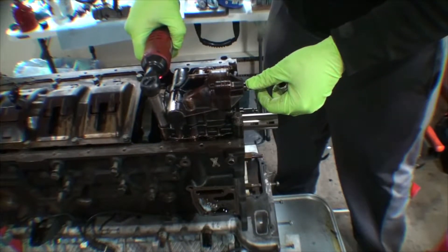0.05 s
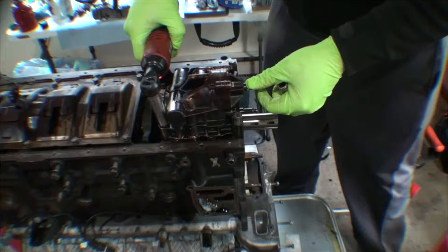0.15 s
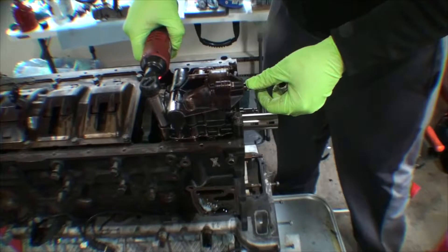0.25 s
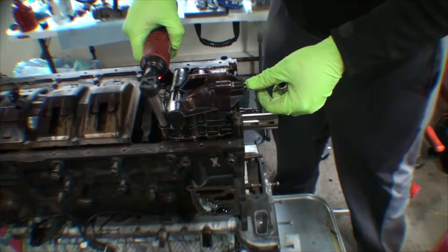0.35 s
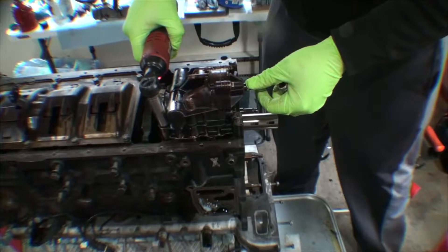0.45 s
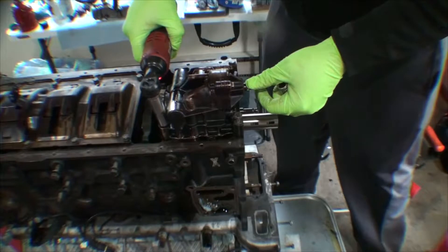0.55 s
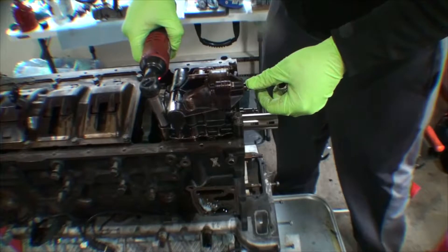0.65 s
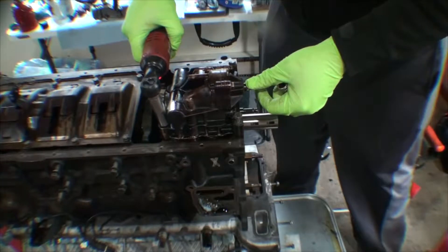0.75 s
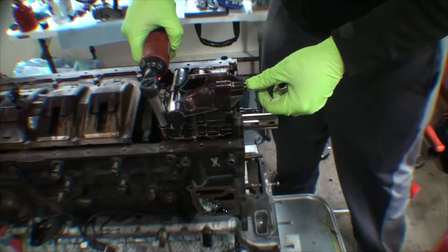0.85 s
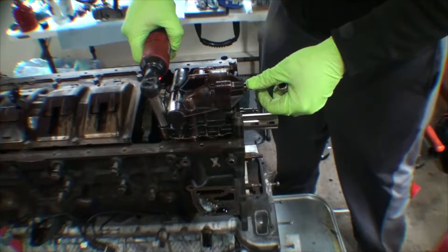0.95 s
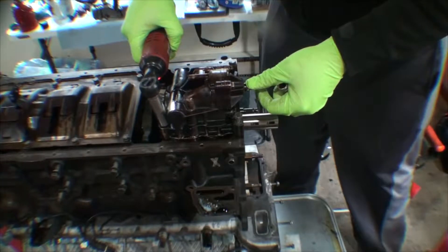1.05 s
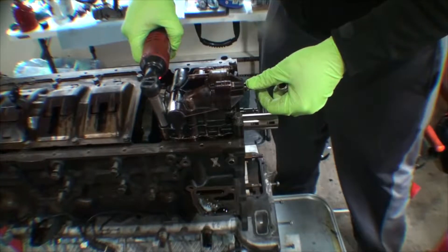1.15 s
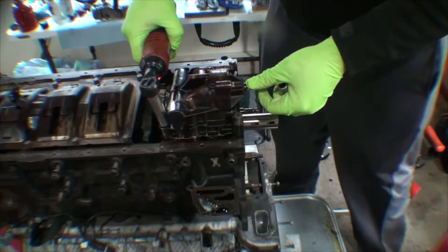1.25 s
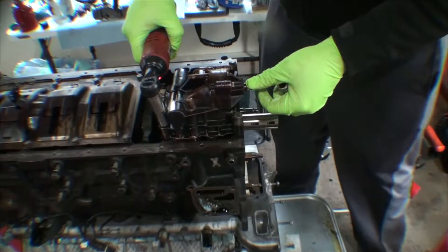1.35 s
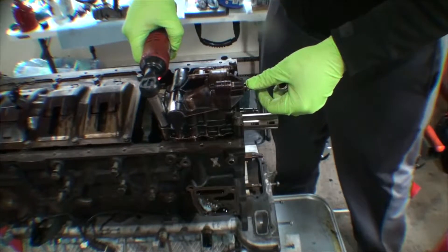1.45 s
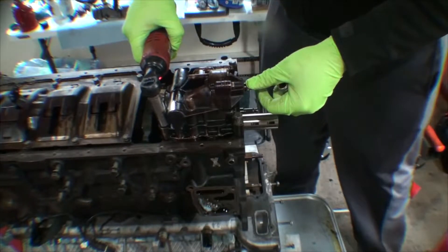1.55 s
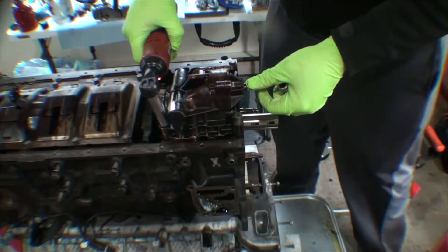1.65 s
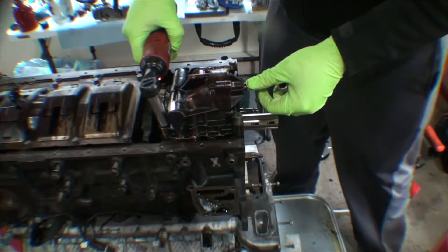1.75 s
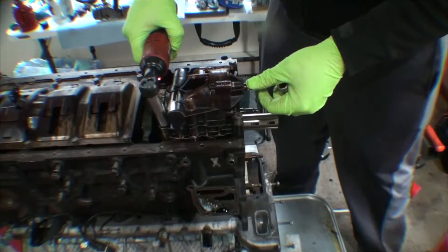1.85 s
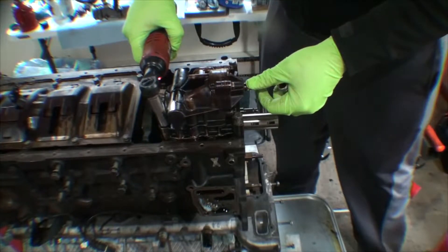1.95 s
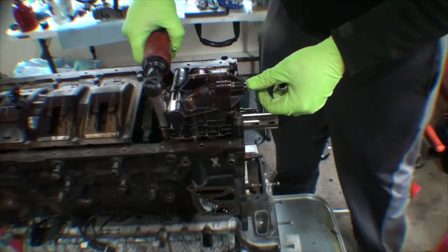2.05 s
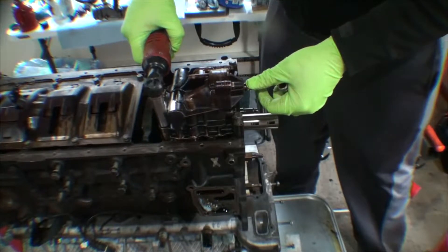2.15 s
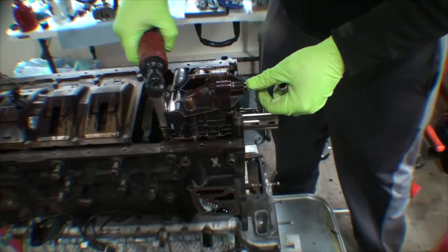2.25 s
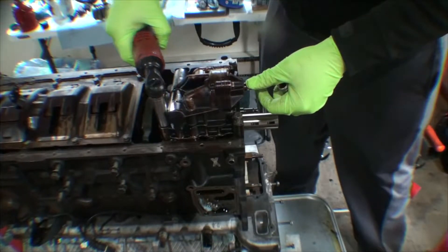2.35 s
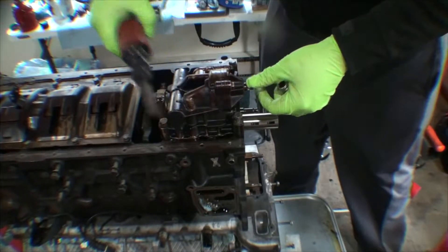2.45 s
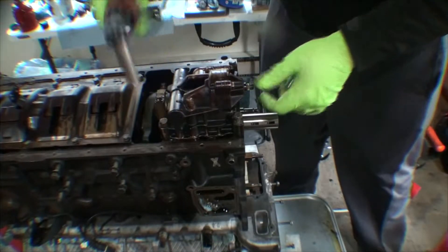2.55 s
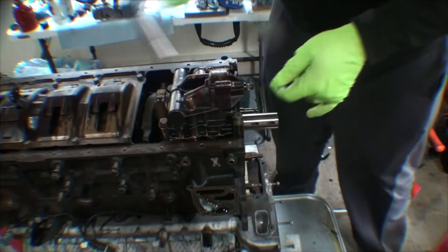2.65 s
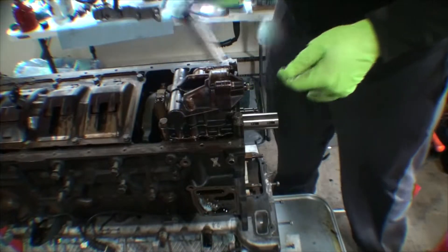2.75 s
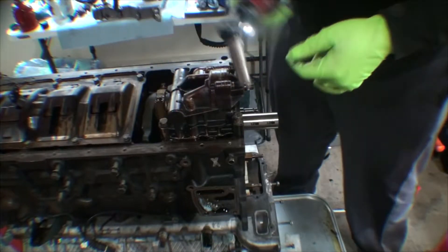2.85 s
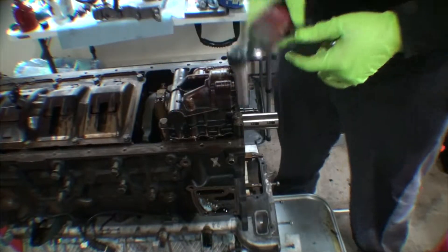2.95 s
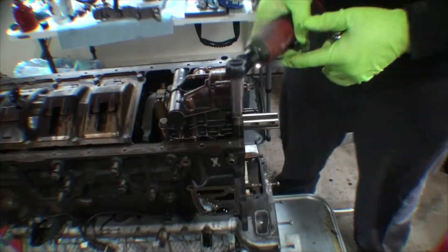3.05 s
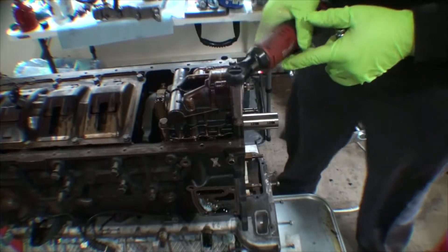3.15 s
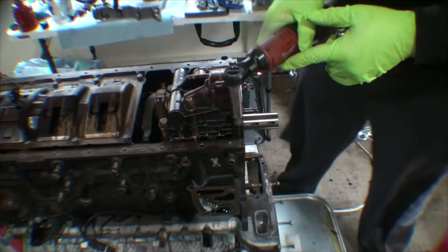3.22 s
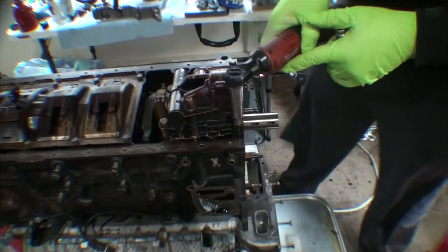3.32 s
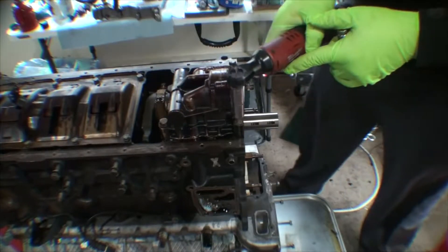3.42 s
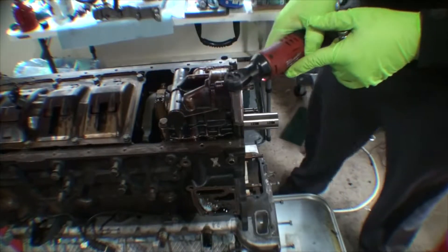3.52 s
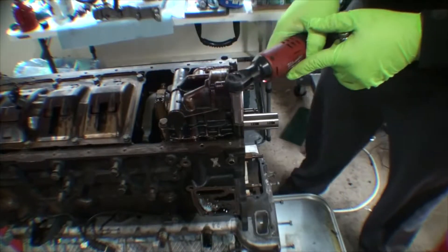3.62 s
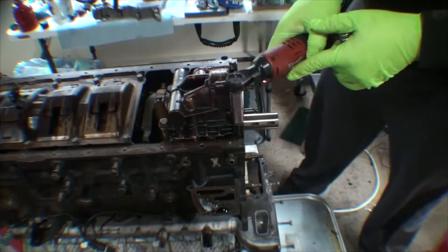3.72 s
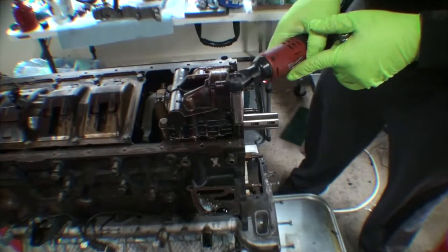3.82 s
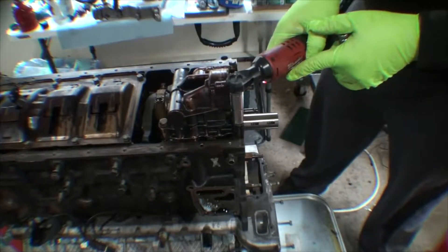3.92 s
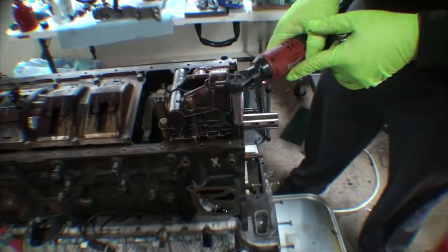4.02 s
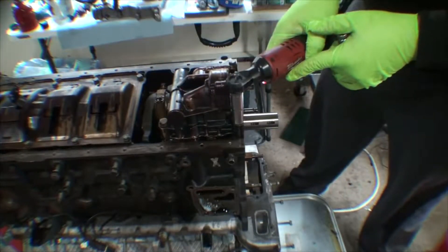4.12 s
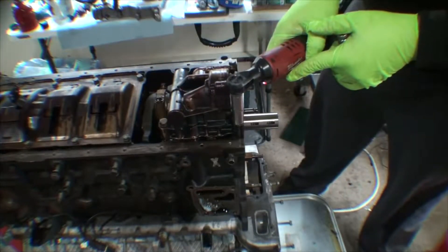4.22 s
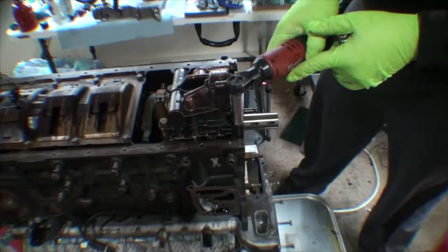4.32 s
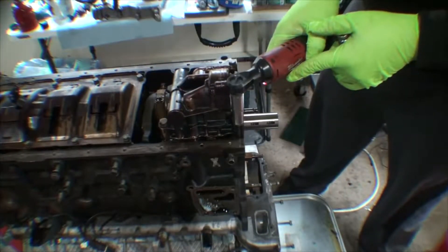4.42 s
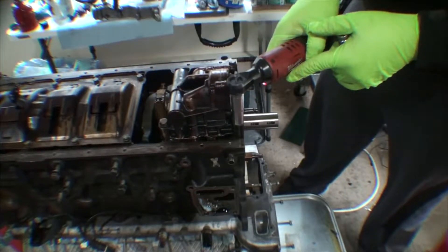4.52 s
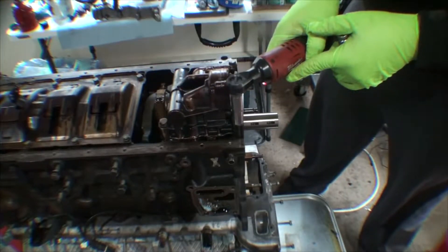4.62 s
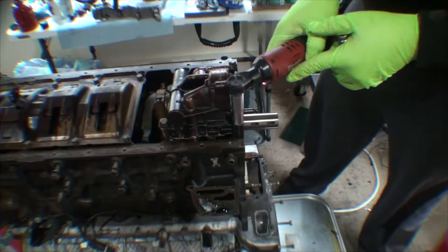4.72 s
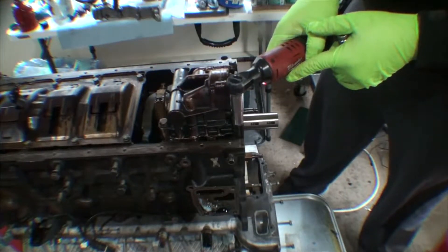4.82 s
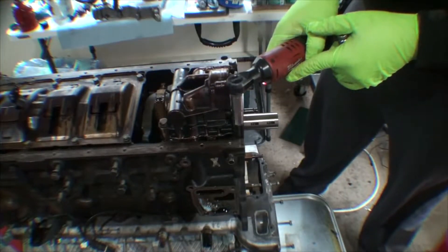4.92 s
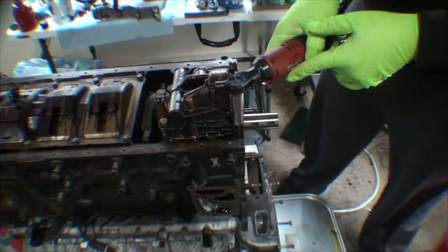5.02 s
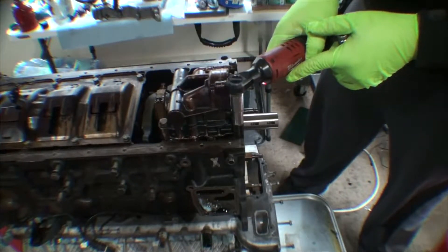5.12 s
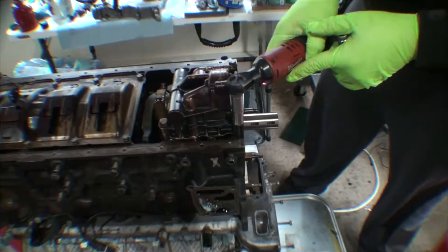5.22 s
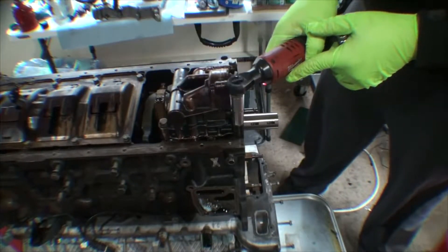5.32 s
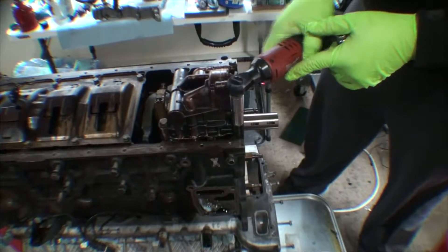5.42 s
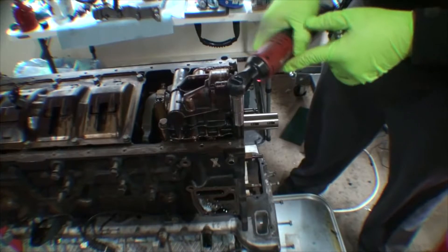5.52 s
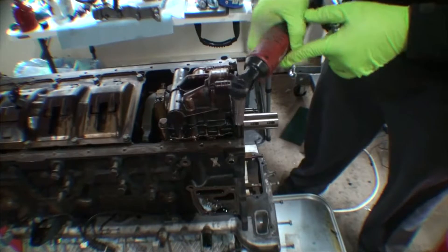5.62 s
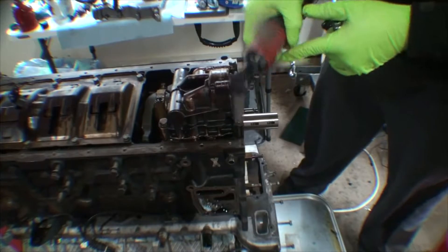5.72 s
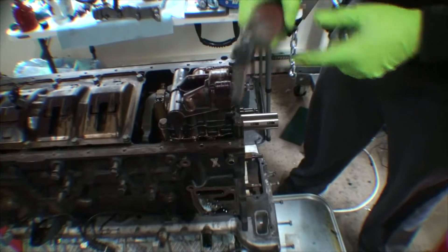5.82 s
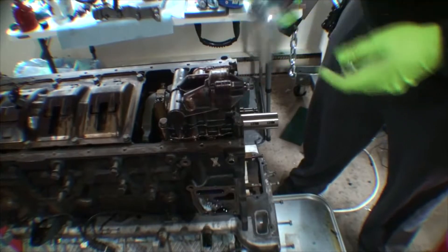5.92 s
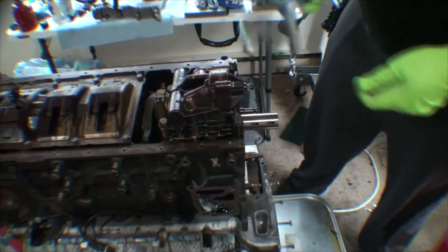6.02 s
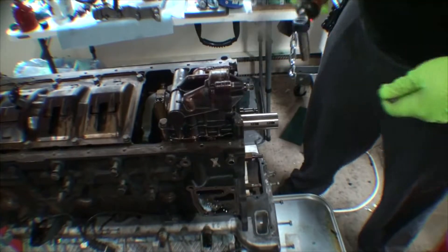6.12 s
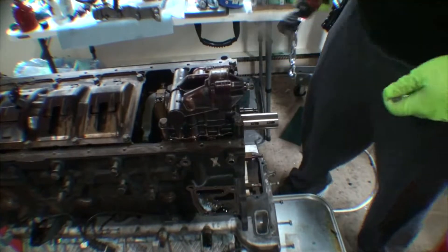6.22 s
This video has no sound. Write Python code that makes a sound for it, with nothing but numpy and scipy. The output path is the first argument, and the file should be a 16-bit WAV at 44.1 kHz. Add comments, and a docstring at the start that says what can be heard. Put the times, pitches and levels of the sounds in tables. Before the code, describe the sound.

Close by in a small workshop, a power ratchet tightens two bolts in an engine block, in two bursts of about two seconds each. Each is a whining, rattling stream of sharp clicks that drags down in speed as the bolt comes tight. The steel socket clanks going on and coming off, and the block rings and thuds faintly. Gloves and sleeves rustle very softly in the quiet after each run.

```python
"""A cordless ratchet runs two bolts into an engine block in a small workshop, slowing as each seats.
In every stroke the pawl snaps twice and the yoke knocks, while the gear teeth rattle and whine.
The pawl snaps extra hard on some strokes of the first bolt; the thread binds now and then on both.
The socket clanks as it seats and is lifted off; the block rings and shudders on its stand.
Gloves and sleeves rustle over quiet air, and the room answers."""
import sys
import numpy as np
from scipy import signal
from scipy.fft import rfft, irfft, next_fast_len
from scipy.io import wavfile
from scipy.ndimage import uniform_filter1d

SR = 44100
rng = np.random.default_rng(int(sys.argv[2]) if len(sys.argv) > 2 else 0)


def store_pcm(level_fs):
    """Save levels as 16-bit WAV."""
    pcm = np.round(np.clip(level_fs, -1, 1) * 32767).astype(np.int16)
    wavfile.write(sys.argv[1], SR, np.atleast_2d(pcm).T)


N = 276504
T = np.arange(N) / SR
HZ = np.maximum(np.arange(N // 2 + 1) * SR / N, 1)

# Low modes of the block on its stand. Each row: frequency in Hz, width in Hz, gain in dB.
STAND_MODES = [(176.4, 20, -3.5), (338.8, 34, 2.5), (428, 55, -5.5)]


def undb(db):
    """Decibels to gain."""
    return 10 ** (np.asarray(db) / 20)


def unit(x):
    """Scale to rms 1."""
    return x / np.sqrt(np.mean(x ** 2))


def noise():
    """White noise."""
    return rng.standard_normal(N)


def walk(rate_hz):
    """Smooth random motion, spread near 1."""
    hold = int(SR / rate_hz)
    steps = np.repeat(rng.standard_normal(N // hold + 1), hold)[:N]
    return 1.3 * uniform_filter1d(steps, hold)


def fade(start_s, decay_s):
    """Sudden onset, exponential decay."""
    return (T >= start_s) * np.exp(-np.abs(T - start_s) / decay_s)


def bump(centre_s, half_s):
    """Gaussian envelope."""
    return np.exp(-((T - centre_s) / half_s) ** 2)


def curve(points):
    """Interpolate (Hz, value) points over log frequency."""
    hz, values = np.transpose(points)
    return np.interp(np.log(HZ), np.log(hz), values)


def spectrum(points):
    """Gain curve from (Hz, dB) points."""
    return undb(curve(points))


def resonances(modes):
    """Gain curve from (Hz, width Hz, dB) peaks."""
    return sum(undb(db) / (1 + (2 * (HZ - hz) / width_hz) ** 2) for hz, width_hz, db in modes)


def colour(x, gain):
    """Minimum-phase filter, gain scaled to rms 1: rings after a blow, never before."""
    cepstrum = irfft(np.log(unit(gain) + 1e-6), N)
    cepstrum[1:N // 2] *= 2
    cepstrum[N // 2 + 1:] = 0
    response = irfft(np.exp(rfft(cepstrum)), N)[:SR // 10]
    return signal.fftconvolve(x, response)[:N]


def steady(x):
    """Even out the level over 0.1 s."""
    power = uniform_filter1d(x ** 2, SR // 10)
    return x / np.sqrt(power + power.max() / 100)


def close_pair(pair):
    """Two close microphones hear diffuse sound partly alike."""
    # Each row: frequency in Hz, coherence 0-1.
    coherence = [(50, 0.65), (300, 0.92), (1000, 0.79), (2500, 0.25), (5000, 0.23), (8000, 0), (12000, 0.6)]
    alike = np.clip(curve(coherence), 0, 1)
    mid, side = rfft(pair) * np.sqrt([(1 + alike) / 2, (1 - alike) / 2])
    return irfft([mid + side, mid - side], N)


def aim(pair, balance):
    """Stereo phase and balance; balance points are (Hz, left minus right dB)."""
    # Each row: frequency in Hz, lead of the left channel in radians.
    phase_lead = [(0, 0), (260, -1.16), (600, -1), (2930, -0.58), (6290, -0.14), (7670, 0.94), (9650, 1),
                  (11500, 0.26), (16600, 0.094)]
    gain = np.sqrt(spectrum(balance)) * np.exp(.5j * curve(phase_lead))
    return irfft(rfft(pair) * [gain, 1 / gain], N)


def echo(near_db, room_db, near_s=0.0066, build_s=0.0027, t60_low_s=0.49, t60_high_s=0.24):
    """Quick reflections off the engine, then a room tail that dies sooner in the treble."""
    t = T[:SR // 2]
    near = unit(rng.standard_normal(len(t)) * np.exp(-t / near_s))
    hz, frame_s, bins = signal.stft(rng.standard_normal(len(t)), SR)
    t60_s = np.interp(hz, [700, 13000], [t60_low_s, t60_high_s])
    tail = signal.istft(bins * np.exp(-np.log(1000) * frame_s / t60_s[:, None]), SR)[1][:len(t)]
    tail = unit(tail * (1 - np.exp(-t / build_s)))
    return (undb(near_db) * near + undb(room_db) * tail) / np.sqrt(len(t))


def workshop(x, near_db, room_db, shake_hz=30, paths=6):
    """Direct sound plus echoes; the shaking tool shifts its sound among the paths."""
    shares = np.array([walk(shake_hz) for _ in range(paths)])
    shares /= np.linalg.norm(shares, axis=0)
    lead = SR // 4  # the tool is already running at 0 s, so pre-fill the room
    parts = np.pad(x * shares, ((0, 0), (lead, 0)), "reflect")
    size = next_fast_len(N + SR)
    responses = np.array([[echo(near_db, room_db) for _ in range(paths)] for _ in range(2)])
    echoes = irfft((rfft(parts, size) * rfft(responses, size)).sum(axis=1), size)[:, lead:lead + N]
    return (x + close_pair(echoes)) / np.sqrt(1 + undb(near_db) ** 2 + undb(room_db) ** 2)


def shop_air(db=-59):
    """Quiet, diffuse room noise."""
    # Each row: frequency in Hz, gain in dB.
    air_colour = [(15, -25.5), (25, -7), (103, -11), (167, -9), (278, -9), (383, -10.5), (450, -12),
                  (749, -12.5), (1210, -14.5), (1420, -17), (5140, -25.5), (6540, -29), (15000, -36)]
    return undb(db) * close_pair([colour(noise(), spectrum(air_colour)) for _ in range(2)])


def rustle():
    """Gloves and sleeves rub as the tool is moved."""
    # Each row: centre in seconds, half length in seconds, level in dB.
    moves = [(2.697, 0.1, -60.5), (2.945, 0.1, -63.5), (6.083, 0.23, -65.5)]
    cloth = colour(noise(), spectrum([(300, -12.5), (1500, -2.5), (10000, -6.0), (15000, -17)]))
    envelope = sum(undb(db) * bump(centre_s, half_s) for centre_s, half_s, db in moves)
    return workshop(cloth * envelope, -2, -2, paths=1)


def blip(centre_s=.42, half_s=.01, low_hz=390, high_hz=520, db=-29):
    """A short, hollow, rising blip."""
    hz = np.interp(T, [centre_s - half_s / 2, centre_s + half_s], [low_hz, high_hz])
    tone = np.sin(2 * np.pi * np.cumsum(hz) / SR)
    return workshop(undb(db) * bump(centre_s, half_s) * tone, -20, -6.5, shake_hz=3, paths=1)


def trigger_squeal(start_s=3.412, decay_s=0.034, hz=5600, db=-42.0):
    """The motor drive sings briefly as the trigger is squeezed."""
    return undb(db) * fade(start_s, decay_s) * np.sin(2 * np.pi * hz * T)


def block_thuds():
    """The heavy block shudders on its stand as torque is taken up and let go."""
    # Each row: start in seconds, level in dB, decay in seconds, relative stand ring in dB.
    jolts = [(1.28, -56.5, 0.32, -12), (2.19, -61, 0.2, 14), (2.329, -52.5, 0.048, 1),
             (2.41, -54.5, 0.062, -0.5), (5.50, -46, 0.069, -8), (5.553, -43.5, 0.06, -3),
             (5.625, -52, .06, 2)]
    # Each row: frequency in Hz, gain in dB.
    thud_colour = [(20, -5), (47, 3.5), (80, -11), (130, -13.5), (178, -5), (250, -10.5), (330, -16),
                   (600, -38.5)]
    push = sum(undb(db) * fade(start_s, decay_s) for start_s, db, decay_s, _ in jolts)
    ring = sum(undb(db + ring_db) * fade(start_s, decay_s) for start_s, db, decay_s, ring_db in jolts)
    thud = colour(push * noise(), spectrum(thud_colour))
    return thud + undb(-6.5) * colour(ring * noise(), resonances(STAND_MODES[:1]))


def socket_ring(start_s=5.496, decay_s=0.014, hz=5000, width_hz=400, db=-16):
    """The socket rings as the second bolt comes up tight."""
    ring = unit(colour(noise(), resonances([(hz, width_hz, 0)])))
    return workshop(undb(db) * fade(start_s, decay_s) * ring, 0, -4.5, paths=1)


def socket_clanks(ref_scrape_s=0.0033, relative_width=0.08):
    """The socket strikes bolt and block; a longer scrape rings the block harder."""
    # Each row: start in seconds, blow count, gap in seconds, level in dB, tilt in dB per octave,
    # scrape decay in seconds, ring pitch in Hz, ring gain in dB.
    contacts = [(0.863, 1, 0, -30.5, -4.5, .012, 2300, -12), (2.161, 1, 0, -18, -1.5, 0.0051, 1500, -5.5),
                (2.235, 2, .025, -17.5, -1, 0.0052, 2780, -8.5),
                (2.314, 2, .008, -19.5, -1.9, .005, 1460, 1.5), (2.352, 1, 0, -24, 17, .001, 1520, -2),
                (2.392, 1, 0, -29, 0.5, 0.0065, 2400, -8), (2.4, 1, 0, -20.5, 1, 0.002, 2400, -11),
                (2.504, 1, 0, -38, 2, 0.00206, 2400, -10), (2.91, 1, 0, -37, -4.5, .003, 868, 7),
                (3.274, 1, 0, -27, 3.5, 0.0035, 4200, 7.5), (3.287, 1, 0, -34.5, -1.5, .016, 1700, -8.5),
                (3.421, 1, 0, -34, -2, 0.049, 1800, -1.5), (3.459, 3, .0055, -16, 1, .0007, 3870, -6),
                (3.4937, 2, .0175, -11.5, 2, .002, 7600, -3), (3.523, 2, .015, -13, 0, 0.002, 3630, -5.5),
                (3.551, 1, 0, -12, 2, .007, 2750, -6), (3.567, 1, 0, -13, 1.5, .0015, 3620, -1),
                (5.439, 2, .034, -11.5, -2, .001, 3700, -5.5), (5.496, 1, 0, -14.5, -.5, .008, 1520, 7.5),
                (5.519, 1, 0, -15, -0.5, .008, 1550, 3), (5.51, 1, 0, -24, -4.5, .03, 539, 9.5),
                (5.548, 2, .0035, -16, 0.5, 0.007, 2250, -6.5), (5.622, 1, 0, -24.5, -2, .008, 2400, -1),
                (5.625, 1, 0, -10.5, 5, 0.0008, 3180, -8)]
    # Each row: frequency in Hz, gain in dB.
    clank_colour = [(100, -29), (180, -21), (260, -20.5), (340, -9), (600, -6.5), (850, 2), (1500, 1),
                    (2500, 2.5), (3700, 2), (5100, -1), (7000, -4.5), (12000, -14), (15000, -38.5)]
    # Each row: frequency in Hz, relative level in dB, T60 in seconds.
    block_modes = [(279.5, -47, 0.64), (339, -37.5, 0.34), (763, -26.5, 0.92), (950, -35.5, 1),
                   (1238, -37.5, .75), (1590, -30, 0.66), (2410, -34, 0.5)]
    clanks, ring, push = 0, 0, np.zeros(N)
    body = spectrum(clank_colour)
    for first_s, count, gap_s, db, tilt_db, scrape_s, ring_hz, ring_db in contacts:
        starts_s = first_s + gap_s * np.arange(round(count))
        scrape = sum(fade(start_s, scrape_s) for start_s in starts_s) * noise()
        tilt = undb(tilt_db * np.log2(np.maximum(HZ, 500) / 2000))
        peak = 1 + resonances([(ring_hz, relative_width * ring_hz, ring_db)])
        clanks += undb(db) * colour(scrape, body * tilt * peak)
        push[(starts_s * SR).astype(int)] += undb(db) * np.sqrt(scrape_s / ref_scrape_s)
    for hz, db, t60_s in block_modes:
        energy = signal.lfilter([1], [1, -np.exp(-2 * np.log(1000) / (t60_s * SR))], push ** 2)
        ring += undb(db) * np.sin(2 * np.pi * hz * T) * np.sqrt(energy)
    return workshop(clanks, -4.5, -4, paths=3) + undb(-9.5) * ring


def motor(timing, strokes_hz, spin_up_s=.03, fade_out_s=0.009):
    """Spins up, then slows with effort: 0 free, 1 loaded, 2 seated. One crank turn per stroke."""
    trigger_s, bite_s, load_s, seat_s, stop_s, first_turn = timing
    loading = 1 - np.clip(1 - (T - bite_s) / load_s, 0, 1) ** 2
    effort = loading + np.clip((T - seat_s) / (stop_s - seat_s), 0, 1)
    spin = 1 - np.exp(-np.maximum(T - trigger_s, 0) / spin_up_s)
    turns = first_turn + np.cumsum(spin * np.interp(effort, [0, 1, 2], strokes_hz)) / SR
    running = spin ** 4 * np.exp(-np.maximum(T - stop_s, 0) / fade_out_s)
    return turns, effort, running


def stroke_times(first_s, count, turns):
    """Times in seconds of successive strokes."""
    return np.interp(np.interp(first_s, T, turns) + np.arange(round(count)), turns, T)


def blows(turns, phase, scatter_db, slop_turns):
    """One impulse per turn at the given phase, uneven in size and timing."""
    marks = np.arange(np.ceil(turns[0] - phase), turns[-1] - phase) + phase
    jitter, size = rng.standard_normal((len(marks), 2)).T
    samples = np.interp(marks + slop_turns * jitter, turns, np.arange(N)).astype(int)
    return np.bincount(samples, undb(scatter_db * np.clip(size, -2, 2)), N)


def chatter(hits, decay_s):
    """Each impulse becomes a noise burst: steel chattering on steel."""
    return signal.lfilter([1], [1, -np.exp(-1 / (decay_s * SR))], hits) * noise()


def thread_binds(turns, body, decay_s=0.0014):
    """The yoke strikes hard where the thread binds."""
    # Each row: start in seconds, stroke count, level in dB.
    binds = [(.038, 4, -14), (.074, 1, -14), (.369, 2, -13.5), (0.443, 4, -13.5), (0.841, 3, -13.5),
             (1.2215, 1, -24), (1.2631, 3, -14.5), (1.696, 3, -13), (1.805, 2, -12), (2.092, 2, -17.5),
             (4.082, 1, -12.5), (4.365, 1, -10.5), (4.444, 1, -9), (4.828, 1, -12), (4.993, 1, -10.5),
             (5.071, 1, -7.5), (5.184, 1, -12)]
    tilt = spectrum([(250, -17.5), (500, -11), (1000, -6.5), (2500, 0.5), (7000, -3.0), (12000, -2.5)])
    push = sum(undb(db) * fade(start_s, decay_s)
               for first_s, count, db in binds for start_s in stroke_times(first_s, count, turns))
    return workshop(colour(push * noise(), body * tilt), -7.5, -8.0, paths=1)


def hard_pawl_ticks(turns, gain_db=-4, half_s=0.00067, spread_hz=450, rebound_s=.003, rebound_db=-4):
    """The pawl snaps extra hard on some strokes: loud, bright ticks, each with a quick rebound."""
    # Each row: start in seconds, tick count, level in dB, pitch in Hz.
    hard_snaps = [(.015, 3, -19, 12400), (.12, 3, -11, 12300), (.21, 1, -10, 12400), (.322, 5, -16, 12400),
                  (.497, 2, -9, 12400), (.651, 1, -6, 12500), (.732, 5, -9.5, 12500),
                  (.898, 2, -7.5, 12650), (1.063, 2, -6.5, 12550), (1.13, 9, -12, 12750),
                  (1.324, 1, -5, 12600), (1.494, 1, -8, 12500), (1.537, 7, -9.5, 12600),
                  (1.736, 1, -8, 12600), (1.78, 1, -9.5, 12500), (1.93, 3, -8, 12500),
                  (2.018, 5, -8, 12650), (2.157, 1, -10, 12700), (2.211, 1, -6.5, 10900),
                  (2.251, 1, -13, 13000), (2.276, 1, -10, 12600)]
    ticks = 0
    wobble = 2 * np.pi * np.cumsum(spread_hz * walk(2500)) / SR
    for first_s, count, db, hz in hard_snaps:
        envelope = sum(bump(at_s, half_s) + undb(rebound_db) * bump(at_s + rebound_s, half_s)
                       for at_s in stroke_times(first_s, count, turns))
        ticks += undb(db + gain_db) * envelope * np.sin(2 * np.pi * hz * T + wobble)
    return workshop(ticks, -12, -15.0, paths=1)


def block_strain(turns, db, tug_db=2.5):
    """Every stroke tugs at the block and rings its stand."""
    tugs = blows(turns, 0, 5.8, 0.016)
    return unit(colour(tugs, resonances(STAND_MODES))) * undb(db + tug_db * walk(9))


def gear_tones(turns, mesh_cycles, whine_db, hum_db):
    """Gears whine at the tooth rate; the drive hums at two crank harmonics."""
    waver = .22 * walk(40)
    whine = np.sin(2 * np.pi * mesh_cycles + waver) * undb(whine_db + 0.75 * walk(25))
    hum = sum(undb(hum_db + 5.0 * walk(10)) * np.sin(2 * np.pi * order * turns + waver)
              for order in (6, 7))
    return whine + hum


def yoke_knocks(turns, lag_turns, scatter_db):
    """The yoke knocks five times per stroke."""
    # Each row: phase in turns, relative level in dB, decay in seconds.
    knocks = [(0.95, -3.5, 0.00093), (.13, -8.5, 0.00076), (.38, 1, 0.0013), (.48, -1.5, 0.0011),
              (.75, 1, 0.00069)]
    return steady(sum(undb(db) * chatter(blows(turns, phase + lag_turns, scatter_db, .018), decay_s)
                      for phase, db, decay_s in knocks))


def pawl_snaps(turns, level_db, modes, swell, slop_turns, swell_db=1.0, peak_limit=6):
    """Two snaps per stroke, their loudest peaks softly rounded; harder once per socket turn."""
    # Each row: phase in turns, relative level in dB, decay in seconds.
    snaps = [(.98, 0, .0005), (.13, -.5, .0005)]
    bursts = sum(undb(db) * chatter(blows(turns, phase, 1.7, slop_turns), decay_s)
                 for phase, db, decay_s in snaps)
    ring = steady(colour(bursts, resonances(modes)))
    period_strokes, hardest_stroke = swell
    bite_db = swell_db * np.cos(2 * np.pi * (turns - hardest_stroke) / period_strokes)
    return peak_limit * np.tanh(ring / peak_limit) * undb(level_db + bite_db)


def ratchet(motion, levels, body, pawl_modes, swell, *, teeth_db, grind_db, scatter_db,
            slop_turns, lag_turns, near_db, room_db, teeth_per_turn=13.2):
    """One bolt: the crank drives yoke, gears and pawl; effort sets their levels."""
    turns, effort, running = motion
    clatter_db, pawl_db, strain_db, whine_db, hum_db = (
        np.interp(effort, [0, 1, 2], column) for column in np.transpose(levels))
    mesh_cycles = turns * teeth_per_turn
    knocks = yoke_knocks(turns, lag_turns, scatter_db)
    rattle = steady(chatter(blows(mesh_cycles, 0, 4.1, .07), 0.00018))
    clatter = colour(knocks + undb(teeth_db) * rattle + undb(grind_db) * noise(), body)
    midrange = signal.sosfilt(signal.butter(2, [600, 9000], "band", fs=SR, output="sos"), clatter)
    clatter *= undb(clatter_db + 0.35 * walk(12)) / np.std(midrange[running > .5])
    tones = gear_tones(turns, mesh_cycles, whine_db, hum_db)
    strain = block_strain(turns, strain_db)
    pawl = pawl_snaps(turns, pawl_db, pawl_modes, swell, slop_turns)
    pawl = workshop(pawl * running, -15, -10)
    return workshop(clatter * running, near_db, room_db) + pawl + (tones + strain) * running


def scene():
    """Bolt a, then bolt b, with handling and room air."""
    # Trigger, bite, load-up time, seat and stop in seconds, then starting crank phase in turns.
    timing_a = (-1, 0, 1.656, 2.021, 2.325, .266)
    timing_b = (3.42, 4.731, .593, 5.4, 5.555, .263)
    # Stroke rate when free, loaded, seated.
    strokes_a_hz = (57.306, 45.795, 37.67)
    strokes_b_hz = (77.848, 59.284, 39.43)
    # Rows: free, loaded, seated. Each row: clatter, pawl, strain, whine and hum levels in dB.
    levels_a = [(-25, -27, -64, -35.5, -60.5), (-27.5, -29.5, -54, -53, -64),
                (-29, -36, -63.5, -57.5, -67.5)]
    levels_b = [(-21.5, -25, -64.5, -50, -66), (-22.5, -28.5, -65, -45.5, -55), (-27, -39, -58, -48, -50)]
    # Response of tool and block. Each row: frequency in Hz, gain in dB.
    colour_a = [(100, -49.5), (250, -33.5), (540, -20.5), (700, -9.5), (1000, -10.5), (1400, -10.5),
                (2250, -8.5), (2800, -9.5), (3600, -8), (6000, -9.5), (9500, -9.5), (13000, -5),
                (14000, -13.5), (16000, -17.5)]
    colour_b = [(100, -46), (250, -49), (400, -24), (620, -18), (870, -7.5), (1400, -9.5), (2100, -6.5),
                (3600, -5), (6300, -6), (7700, -6), (8800, -5), (12900, -1.5), (14100, -11), (16000, -14)]
    # Socket and pawl modes. Each row: frequency in Hz, width in Hz, gain in dB.
    socket_a = [(700, 60, -11.5), (985, 55, -3), (2155, 70, -5), (2315, 60, -4.5), (2830, 100, -10.5),
                (3688, 14, -1), (3670, 790, -14), (7670, 360, -11.5)]
    socket_b = [(890, 90, -19), (2300, 88, -21), (3600, 450, -10.5), (7650, 400, -3)]
    pawl_a = [(10800, 950, -7), (12670, 1200, -5), (12500, 210, -2)]
    pawl_b = [(10790, 440, 2.5), (12400, 1200, -9.5), (12880, 200, 4)]
    # Strokes per socket turn, then the stroke where the pawl bites hardest.
    swell_a = (20.2, 0)
    swell_b = (15, 11.8)
    # Radiation of the tool. Each row: frequency in Hz, left minus right in dB.
    balance_a = [(200, -9), (700, -2.5), (2000, -3), (4000, -4.5), (6500, -6.5), (8500, -4), (10000, 1.5),
                 (11000, 4), (12400, -6.5), (15000, -3.5)]
    balance_b = [(200, -4), (700, -2.5), (2000, -3.5), (4000, -5), (6000, -7), (8000, -6.5), (10000, 2.5),
                 (10800, 2), (12400, -4), (15000, -3.5)]
    balance_rest = [(30, -13.0), (125, -10.5), (400, -4.0), (1500, -0.5), (5000, -6.0), (12000, -4.5)]

    motion_a, motion_b = motor(timing_a, strokes_a_hz), motor(timing_b, strokes_b_hz)
    body_a = spectrum(colour_a) * (1 + resonances(socket_a))
    body_b = spectrum(colour_b) * (1 + resonances(socket_b))
    bolt_a = ratchet(motion_a, levels_a, body_a, pawl_a, swell_a, teeth_db=2, grind_db=-6.5,
                     scatter_db=1.0, slop_turns=0.0083, lag_turns=0, near_db=-4.0, room_db=-0.5)
    bolt_b = ratchet(motion_b, levels_b, body_b, pawl_b, swell_b, teeth_db=-1, grind_db=-5,
                     scatter_db=3.0, slop_turns=.025, lag_turns=.04, near_db=-4.5, room_db=-2.0)
    rest = socket_clanks() + socket_ring() + block_thuds() + blip() + trigger_squeal()
    rest = rest + shop_air() + rustle()
    # crank turns through both runs
    turns = np.cumsum(np.where(T < timing_b[0], np.gradient(motion_a[0]), np.gradient(motion_b[0])))
    accents = hard_pawl_ticks(turns) + thread_binds(turns, body_a)
    return aim(bolt_a + accents, balance_a) + aim(bolt_b, balance_b) + aim(rest, balance_rest)


def record(dry, ceiling=0.94, top_hz=15900):
    """Round the highest peaks and cut the top."""
    lowpass = signal.ellip(10, .2, 80, top_hz, fs=SR, output="sos")
    return signal.sosfilt(lowpass, ceiling * np.tanh(dry / ceiling))


dry = scene()
out = record(dry)
store_pcm(out)
```